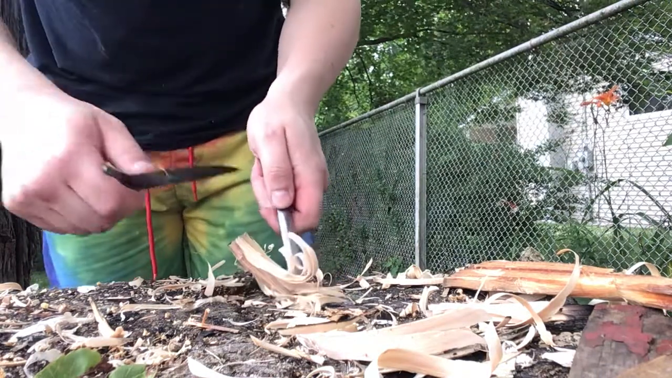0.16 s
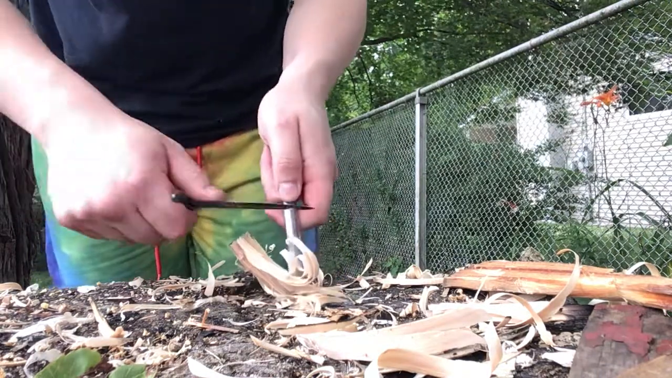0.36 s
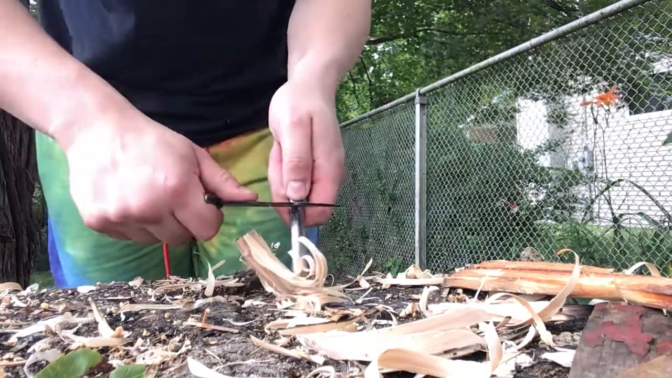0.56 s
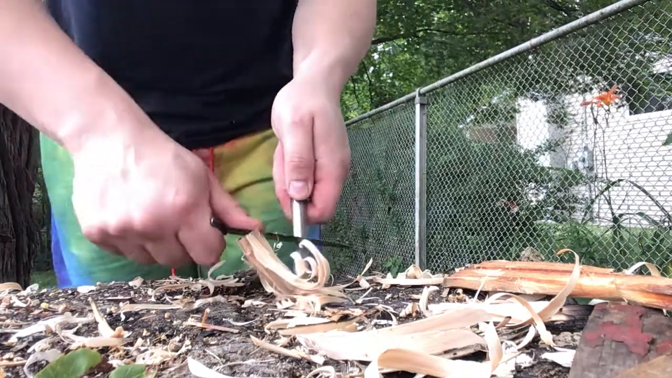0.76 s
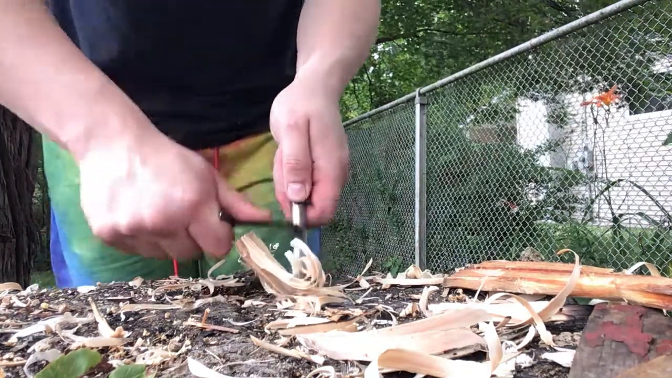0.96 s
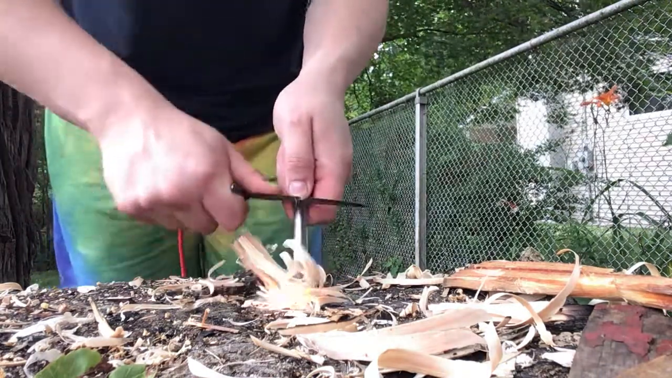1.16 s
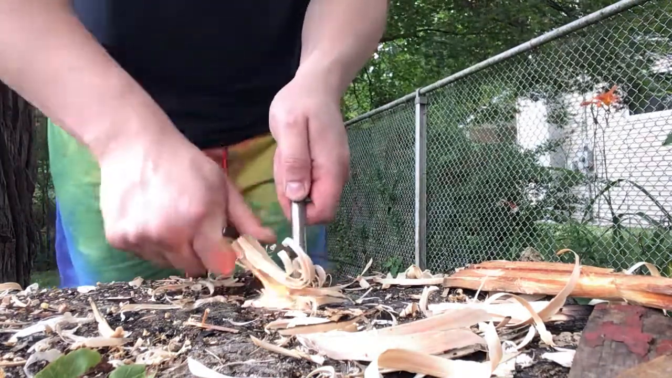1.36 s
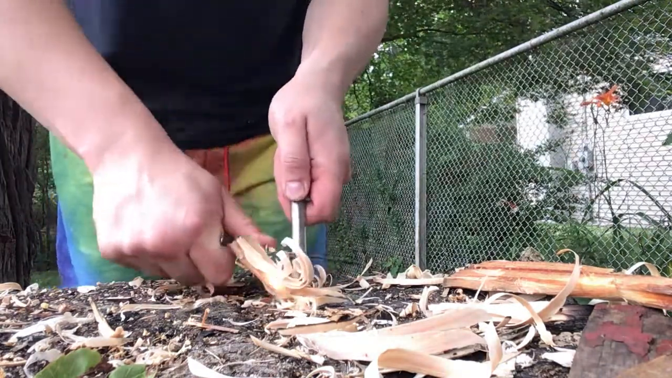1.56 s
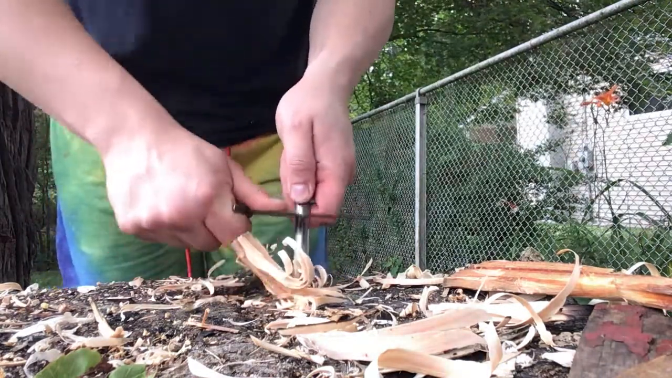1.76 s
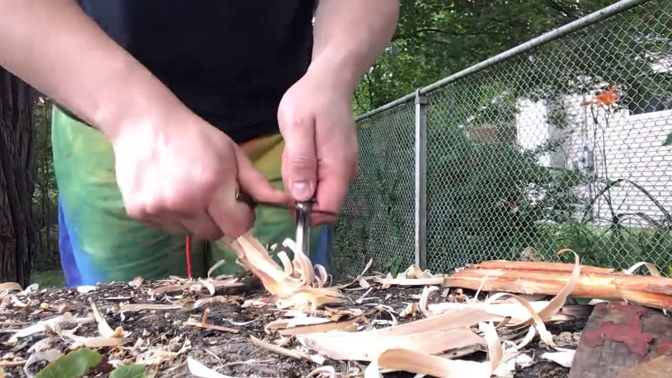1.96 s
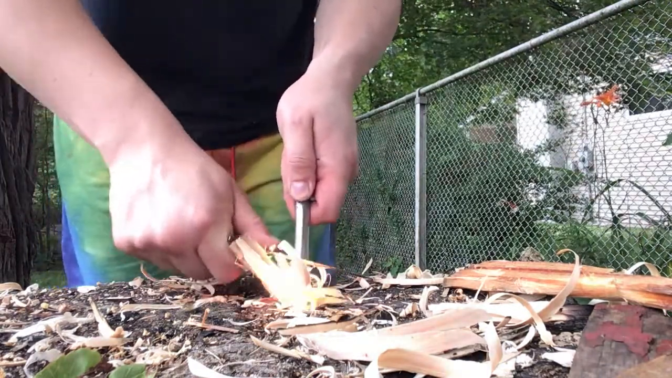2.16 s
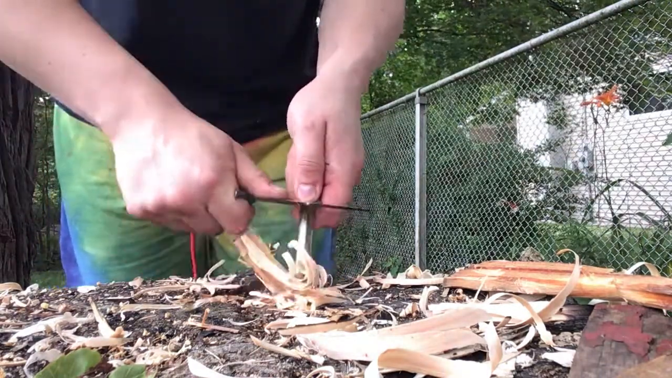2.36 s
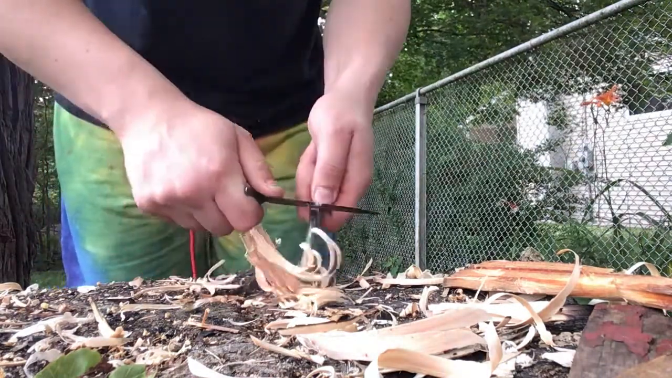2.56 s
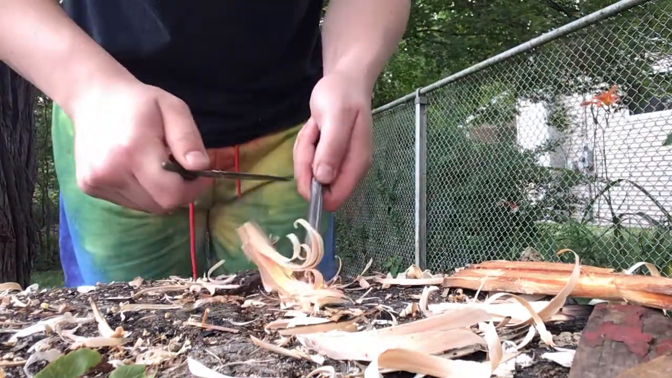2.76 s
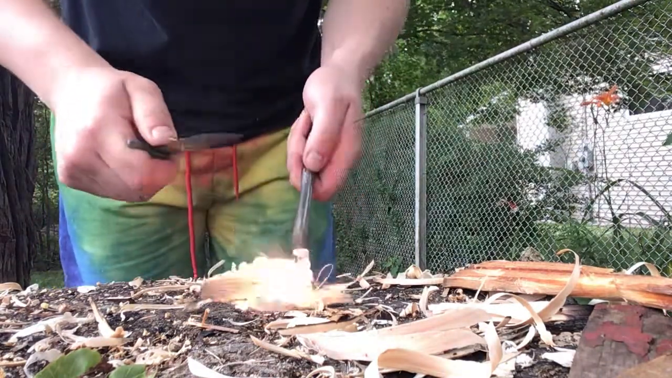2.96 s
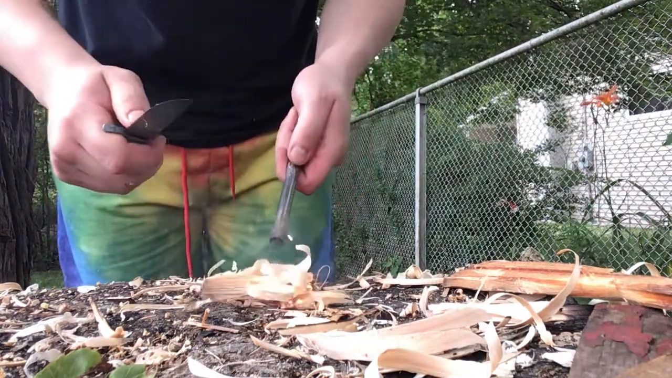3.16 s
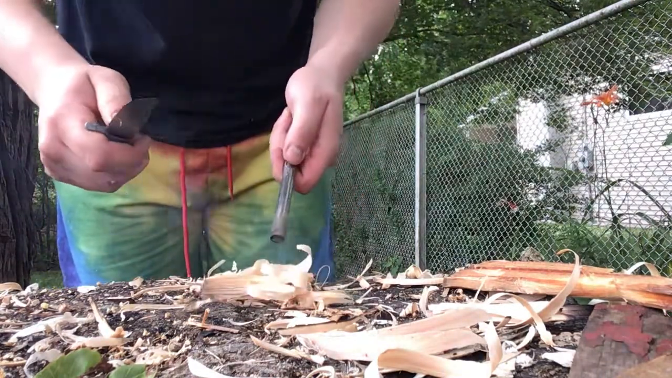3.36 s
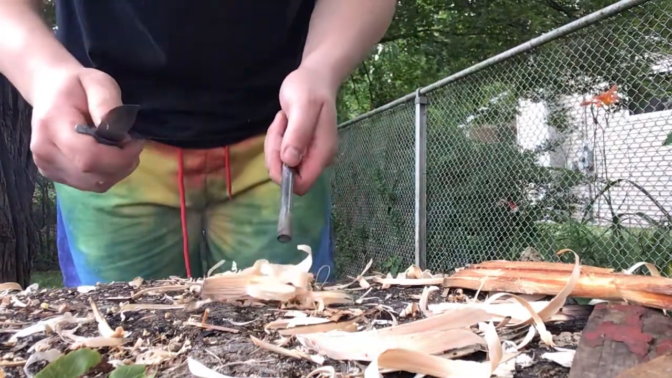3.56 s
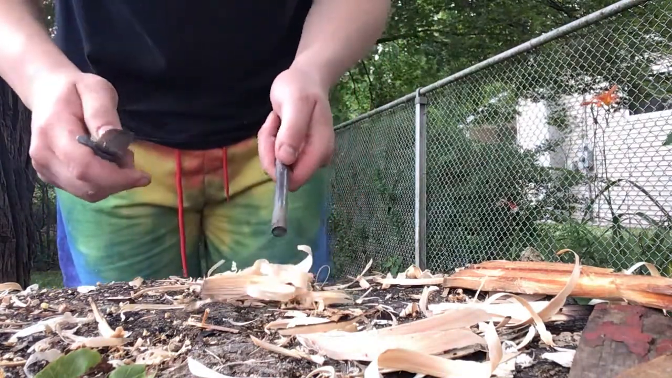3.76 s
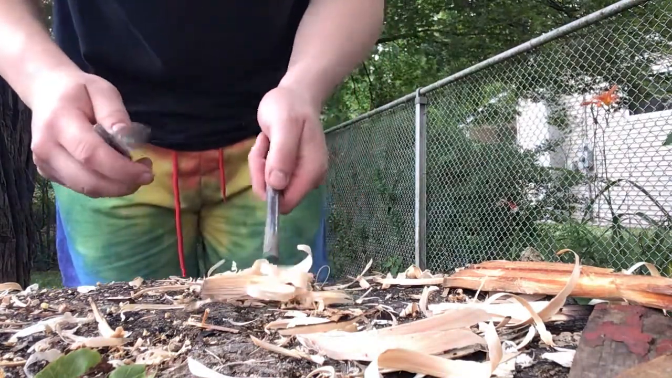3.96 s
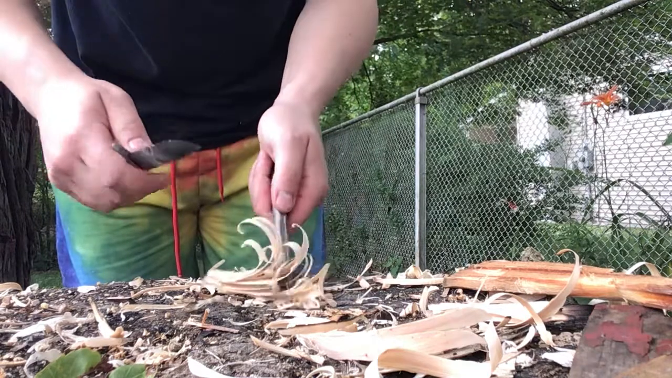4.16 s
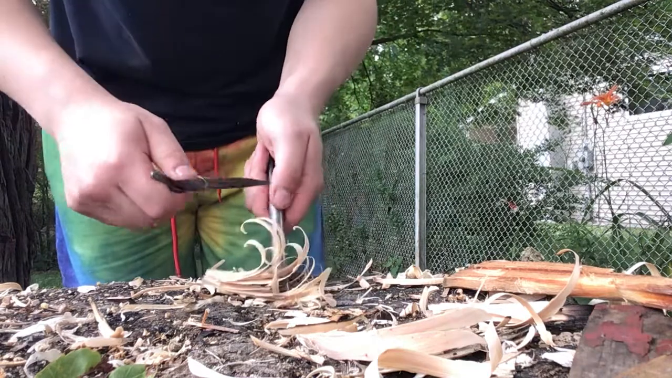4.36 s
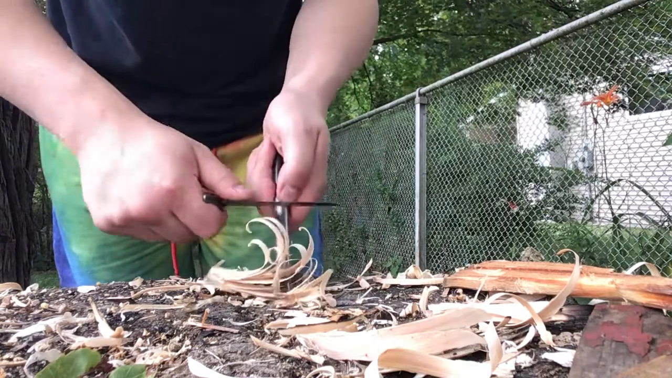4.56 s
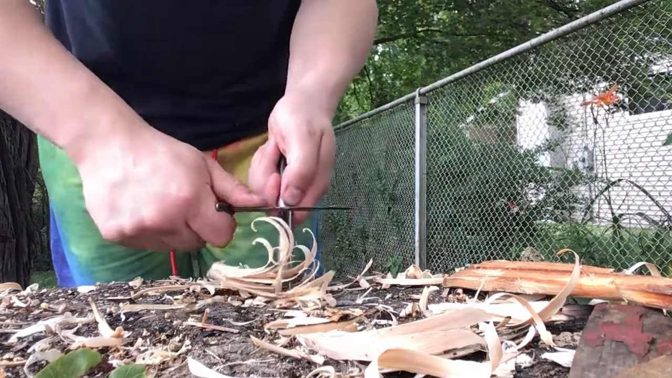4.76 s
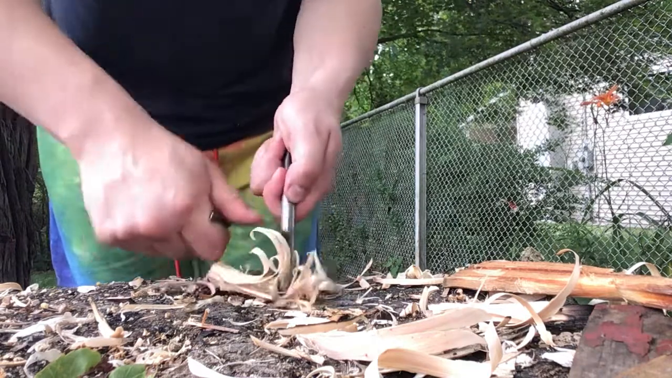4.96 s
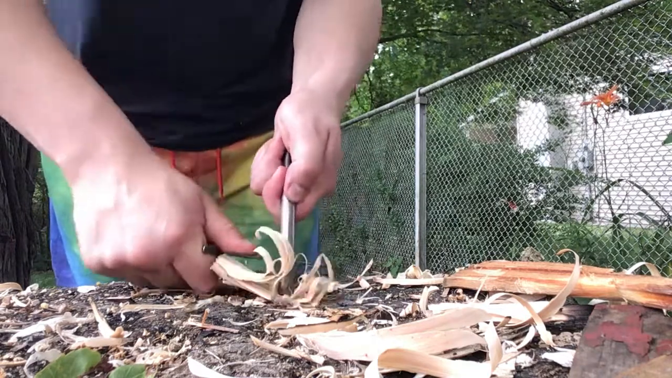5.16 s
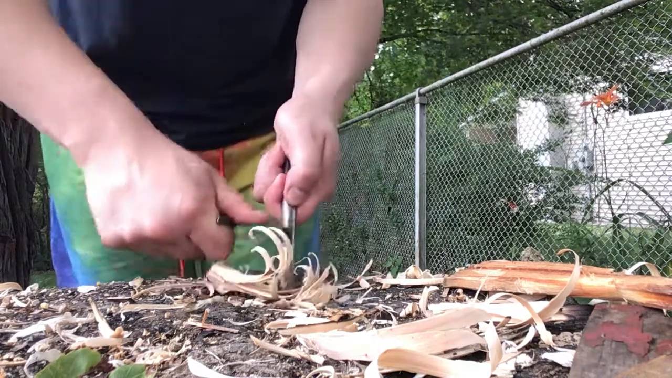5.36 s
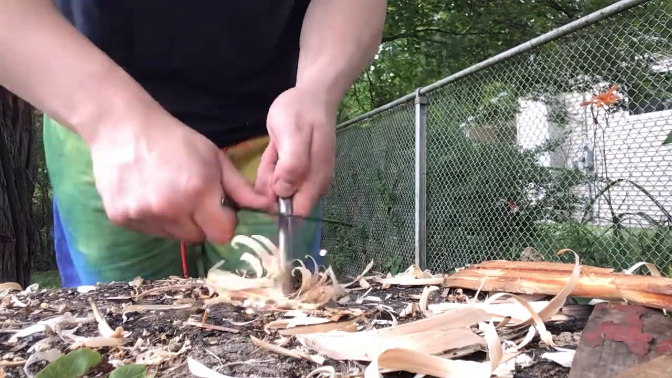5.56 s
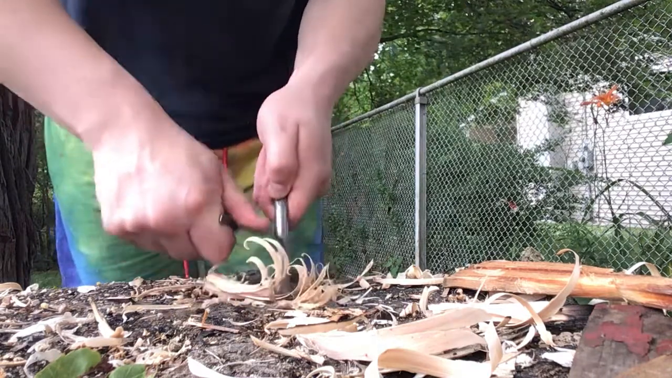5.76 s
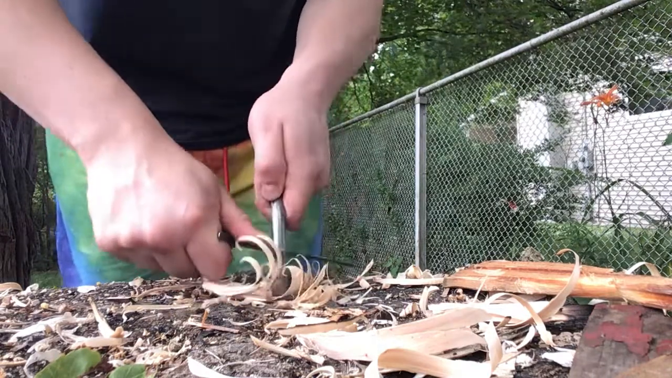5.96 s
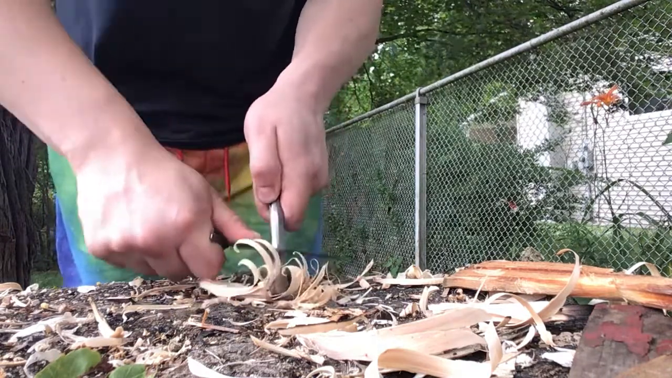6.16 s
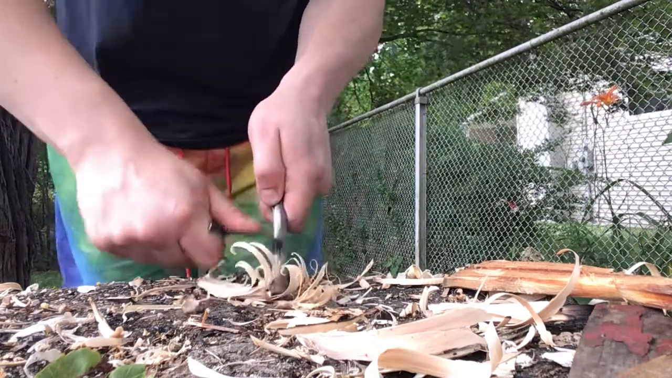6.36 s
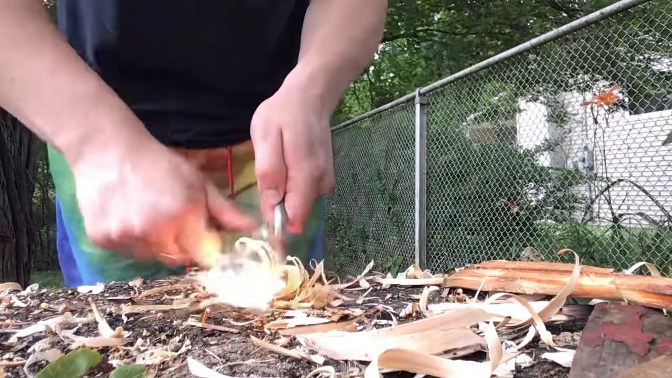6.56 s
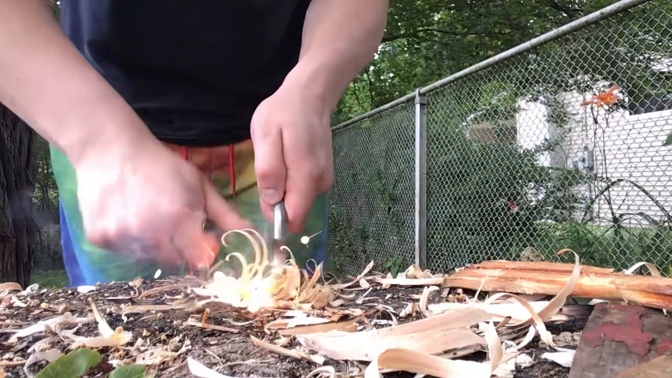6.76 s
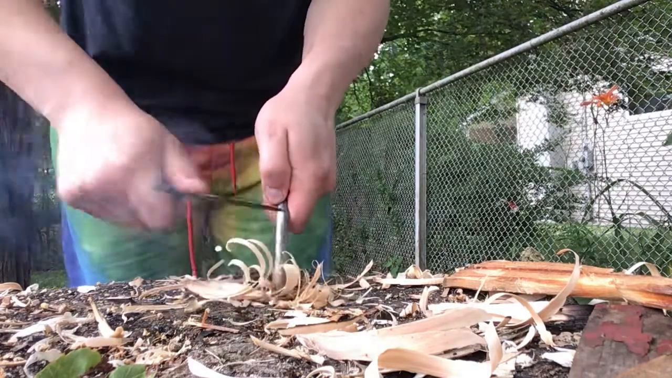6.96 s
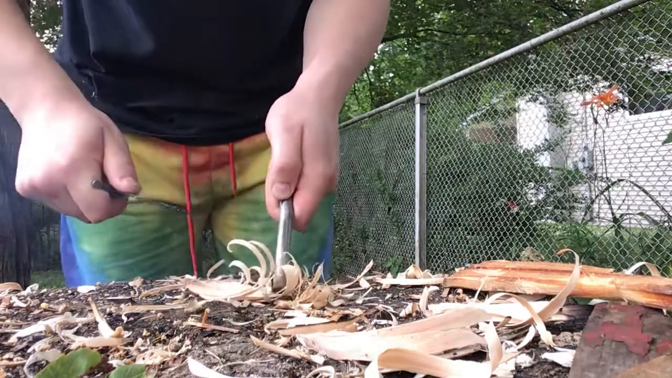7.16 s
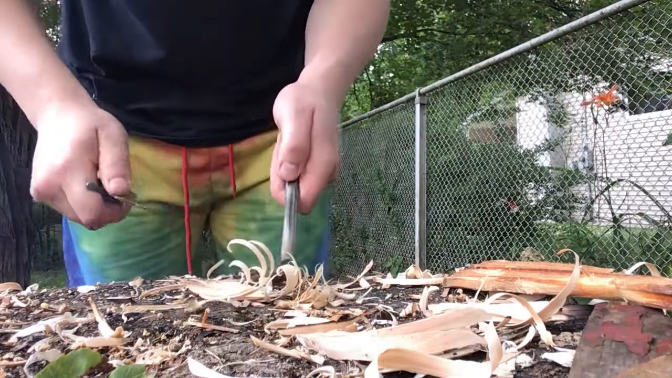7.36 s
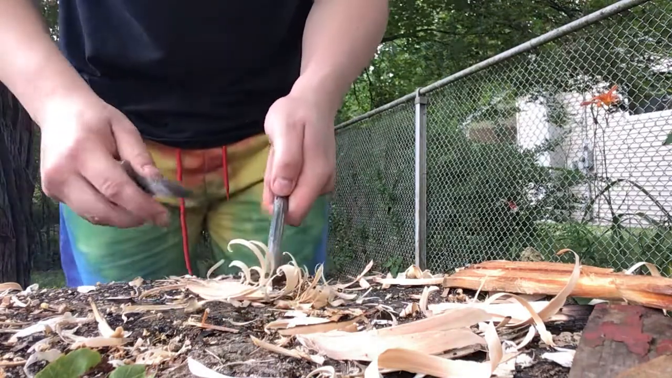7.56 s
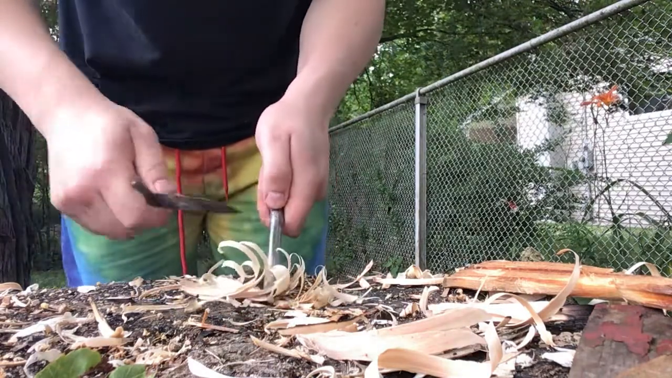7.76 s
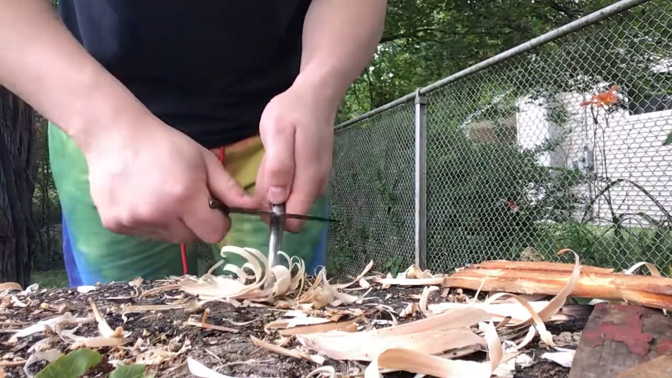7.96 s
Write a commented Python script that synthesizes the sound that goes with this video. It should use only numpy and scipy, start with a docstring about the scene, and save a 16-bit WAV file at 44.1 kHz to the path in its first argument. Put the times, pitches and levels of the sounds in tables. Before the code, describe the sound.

Quick metal scrapes along a fire-starting rod turn to gritty rasps and snapping sparks, over low outdoor rumble and faint birds.

```python
"""Fingers rustle in wood shavings, steel clacks, and a knife spine starts to hiss along a fire steel.
Sliding friction drives the resonances of rod and blade: light strokes hiss, and one squeals by stick-slip.
Hard strokes bite, rasp in spurts as chips break away, and throw sparks that pop.
Behind the work lies a back yard: low town rumble, a faint machine hum and far birds."""
import sys
import numpy as np
from scipy import signal
from scipy.fft import rfft, irfft
from scipy.io import wavfile

SR = 44100
rng = np.random.default_rng(int(sys.argv[2]) if len(sys.argv) > 2 else 0)


def wav_record(signal):
    """Record a signal, one row per channel, as 16-bit PCM in the file named by sys.argv[1]."""
    frames = np.transpose(np.atleast_2d(signal))
    bounded = np.clip(frames, -1, 1)
    # unit amplitude maps onto the largest positive 16-bit level
    quanta = np.round(bounded * 32767).astype(np.int16)
    wavfile.write(sys.argv[1], SR, quanta)


N = 353858
TIME = np.arange(N) / SR

# Spectral shapes of the noise sources: frequency_hz, relative_density_db
RUMBLE_SPECTRUM = [(15, -49), (25, -53), (49, 0.5), (229, -2.5), (263, -6), (285, -6.5), (451, -16.5),
                   (818, -20.5), (1890, -30), (3620, -27), (5880, -34), (8590, -35), (10400, -40.5),
                   (14000, -36.5), (16000, -48)]
RUSTLE_SPECTRUM = [(500, -3), (2200, -5), (4200, 3), (7200, -2.5), (9500, -11.5), (11500, 4), (13500, -0.5),
                   (15800, -8.5)]
TAP_SPECTRUM = [(500, -16.5), (1000, -15), (1600, -3), (2500, -9.5), (3650, 3.5), (4900, -7.5),
                (5900, -5.5), (8700, -22), (11700, -13), (13800, -17), (15500, -26)]
SPARK_SPECTRUM = [(150, -12), (900, -16), (2200, -5.5), (2900, -3), (4600, -1.5), (7500, -7.5),
                  (9500, -21.5), (11400, -8.5), (12500, -11), (15800, -17)]
CATCH_SPECTRUM = [(200, -6.5), (900, -4.5), (2200, -6), (3000, 2), (4300, 3.5), (5600, -5.5), (7500, -3),
                  (9000, -15), (11500, -5), (15800, -11)]
GLIDE_SPECTRUM = [(300, -54), (850, 3), (1150, -37.5), (1500, -9), (2300, -21), (2750, 1.5), (3700, -3.5),
                  (4300, -3), (5800, -7.5), (6600, -4.5), (8600, -17.5), (10200, -12), (14000, -10),
                  (15700, -32)]
RASP_SPECTRUM = [(80, -1), (300, 2), (900, -0.5), (1650, -3), (2350, -4), (2850, -1.5), (4400, -1),
                 (5600, -7), (6800, -5.5), (8800, -16), (11000, -4.5), (14500, -8.5), (15800, -7.5)]

# A small bird's falling notes: start_s, from_hz, level_db
BIRD_CHIRPS = [(3.59, 5640, -68), (3.81, 5250, -76), (6.8, 4750, -62), (6.955, 5700, -58), (7.1, 4600, -64),
               (7.229, 4800, -63.5)]
# Another bird's thin whistles: start_s, length_s, from_hz, to_hz, level_db
BIRD_WHISTLES = [(2.32, 0.3, 8200, 7750, -64.5), (7.696, .07, 9000, 8500, -71),
                 (7.825, 0.06, 9100, 8300, -63)]
# Two cries of a hawk-like bird: start_s, level_db
BIRD_CRIES = [(0.45, -62.5), (4.57, -61.5)]
# The course of one cry: age_s, pitch_hz, relative_db
CRY_CONTOUR = [(0, 905, -22), (.04, 916, -2), (.15, 900, 0), (.28, 892, -9), (.44, 890, 3), (.6, 862, -3),
               (.67, 840, -20)]
# Its harmonics: multiple, relative_db
CRY_HARMONICS = [(3, -10), (4, -0.5), (5, -20), (6, -10), (7, -16), (8, -28)]

# Fingers and shavings stir: start_s, length_s, level_db, ticks_per_s
SHAVING_RUSTLES = [(0.009, 0.054, -53.5, 1100), (0.047, 0.36, -65, 115), (2.309, 0.079, -54, 640),
                   (3.969, .04, -58, 350), (4.001, .14, -65, 1500), (4.17, .36, -73.5, 60),
                   (6.845, 0.13, -55, 300), (6.997, 0.18, -70.5, 48), (7.573, 0.094, -61, 2500)]
# Bending modes of the blade, damped by the hand: frequency_hz, gain_db, t60_s
BLADE_MODES = [(3700, -8, .04), (4900, -8, .1), (5900, 2, .03), (7400, -15, .12), (9620, -4, .09),
               (13650, 0, .06)]
# The blade is set on the rod: start_s, clack_db, ring_drive_db
BLADE_TAPS = [(0.4722, -36, -79), (4.595, -29.5, -55), (7.9465, -25, -41.5)]
# Bursting sparks: start_s, crack_db, puff_relative_db
SPARK_POPS = [(1.688, -22.5, -35), (1.959, -22, -47), (1.9763, -24, -39), (2.788, -25.5, -34),
              (2.8046, -23.5, -25), (2.992, -19.5, -9), (3.008, -17.5, -28), (3.2035, -13.5, -8)]
# The edge judders: start_s, from_hz, level_db
EDGE_CREAKS = [(1.143, 2900, -43.5), (1.405, 2200, -49.5), (5.204, 3970, -40), (5.228, 3000, -46.5),
               (6.24, 2650, -49), (6.632, 3200, -44)]
# The edge catches and skips: start_s, relative_db, low_boost_db
EDGE_CATCHES = [(1.1262, -35, -21), (1.373, -28, 2), (1.6248, -21, 3), (1.903, -29.5, -2),
                (2.3, -31.5, 6.5), (2.3206, -22.5, 2.5), (2.4755, -20, 5.5), (2.7266, -27.5, -6),
                (3.2363, -30.5, 9.5), (3.27, -30.5, 10.5), (3.371, -37, 10), (3.6916, -30, 6.5),
                (5.424, -29, 6.5), (5.5798, -24.5, 2.5), (5.8885, -29.5, 7), (6.37, -30, -10),
                (6.8745, -40, -3), (6.9107, -38.5, 3), (6.939, -38.5, 5)]
# The course of the squeal: time_s, pitch_hz, relative_db
SQUEAL_CONTOUR = [(.828, 2650, -62), (.846, 2520, -32), (.850, 2390, -37), (.854, 2430, -33),
                  (.856, 2370, -24), (.866, 2450, -21), (.871, 2600, -30), (.875, 2900, -54)]
# Its harmonics: multiple, relative_db
SQUEAL_HARMONICS = [(1, -8), (2, -2.5), (3, -22), (4, -23), (5, -17)]
# Resonances of rod and blade in each grip: start_s, [(centre_hz, boost_db)]
GRIP_RESONANCES = [(0, [(3750, 4.5), (11100, 4), (13600, 10.5)]), (4.5, [(3400, 9), (9750, 9), (13800, 5)])]
# Short strokes; sheen is top treble against the middle band: start_s, length_s, level_db, sheen_db
LIGHT_STROKES = [(0.629, .11, -50.5, -2.5), (0.922, .12, -48.5, -2.5), (1.107, 0.11, -47, -7),
                 (1.196, .15, -49.5, -3), (1.473, .13, -49.5, -0.5), (1.757, .12, -48.5, -1),
                 (2.454, 0.051, -48.5, -4), (2.538, 0.072, -54, -5), (4.752, .12, -48, -4),
                 (4.901, .11, -50.5, -8.5), (5.04, .12, -48.5, -4), (5.194, 0.084, -52.5, -4.5),
                 (5.307, 0.093, -49, -4.5), (5.561, 0.13, -47.5, -4.5), (5.73, .074, -53, -8.5),
                 (5.832, .1, -46.5, -3.5), (5.98, 0.072, -53.5, -6), (6.065, .11, -51, -2.5),
                 (6.218, .07, -53.5, -6), (6.313, 0.058, -46.5, 1), (6.71, .1, -51, -3)]
# Long strokes, the level following the hand's pressure: rasp_share_db, sheen_db, [(time_s, level_db)]
HARD_STROKES = [(-4.5, -7.5, [(1.333, -57), (1.343, -48), (1.443, -56), (1.451, -43.5), (1.461, -45),
                (1.475, -67)]), (-3.5, -5, [(1.565, -55.0), (1.61, -53), (1.622, -46.5), (1.658, -52.5),
                (1.73, -45.5), (1.76, -68)]), (-7, -4, [(1.896, -52), (1.904, -48), (1.936, -52.5),
                (1.964, -44.0), (2.145, -50.5)]), (-1.5, -6.5, [(2.145, -54.5), (2.173, -42),
                (2.235, -50.5), (2.261, -47.5), (2.295, -62)]), (-2.5, -10, [(2.62, -65.5), (2.638, -53.5),
                (2.648, -60), (2.752, -44), (2.78, -56), (2.796, -43.5), (2.871, -53.5), (2.919, -51.5)]),
                (0, -7.5, [(2.921, -53.0), (2.999, -39.0), (3.055, -51.5), (3.22, -57.5), (3.265, -50.5),
                (3.308, -65.0)]), (-1.5, -5, [(5.386, -52), (5.424, -43), (5.47, -43), (5.527, -51.5),
                (5.549, -66.5)]), (-0.5, -6.5, [(6.366, -58), (6.378, -42.5), (6.517, -46.5),
                (6.527, -51.5), (6.613, -41.0), (6.735, -52.5)])]


def from_db(db):
    """Amplitude ratio of a level in decibels."""
    return 10 ** (np.asarray(db) / 20)


def rms_one(x):
    """Normalisation to unit power."""
    return x / np.sqrt(np.mean(x ** 2) + 1e-20)


def drift(corner_hz):
    """Low-passed noise: a smooth random wander of unit power."""
    pole = np.exp(-2 * np.pi * corner_hz / SR)
    return rms_one(signal.lfilter([1], [1, -2 * pole, pole * pole], rng.standard_normal(N + SR))[SR:])


def band(x, hz, kind):
    """Second-order Butterworth high- or low-pass."""
    return signal.sosfilt(signal.butter(2, hz, kind, fs=SR, output="sos"), x)


def response(spectrum, size=8192):
    """Minimum-phase impulse response of a body with this spectrum; unit energy."""
    hz, db = np.transpose(spectrum)
    grid_hz = np.maximum(np.fft.rfftfreq(size, 1 / SR), 1)
    magnitude = from_db(np.interp(np.log(grid_hz), np.log(hz), db))
    cepstrum = irfft(np.log(magnitude))
    cepstrum[1:size // 2] *= 2   # folding onto positive time makes it causal
    cepstrum[size // 2 + 1:] = 0
    impulse = irfft(np.exp(rfft(cepstrum)))
    return impulse / np.linalg.norm(impulse)


def colour(force, spectrum):
    """Source and filter: a force is convolved with a body's impulse response."""
    return signal.oaconvolve(force, response(spectrum))[:len(force)]


def add(out, start_s, piece):
    """Superposition of a piece onto the output."""
    start = max(round(start_s * SR), 0)
    out[start:start + len(piece)] += piece[:max(N - start, 0)]


def grains(per_s, spread_db):
    """Shot noise: tiny fractures of uneven size at random moments; unit power."""
    sizes = from_db(spread_db * np.minimum(rng.exponential(1, N), 4))
    occurs = rng.random(N) < per_s / SR
    return rms_one(occurs * sizes * rng.choice([-1, 1], N))


def burst(length_s, spectrum, size=2048):
    """Micro-impacts merge into a noise transient that swells fast and dies; peak about 1."""
    age = 2 * TIME[:size] / length_s
    envelope = age * np.exp(1 - age)
    flurry = colour(rng.standard_normal(size) * envelope, spectrum)
    return flurry * np.linalg.norm(envelope) / np.linalg.norm(flurry) / 2


def harmonic_tone(pitch_hz, harmonics):
    """Fourier series on a moving fundamental; unit power."""
    phase = 2 * np.pi * np.cumsum(pitch_hz) / SR
    return rms_one(sum(from_db(db) * np.sin(round(multiple) * phase) for multiple, db in harmonics))


def glissandi(notes, waver):
    """Sliding sine tones, made hoarse by random frequency modulation."""
    out, wobble = np.zeros(N), 1 + waver * drift(640)
    for start_s, length_s, from_hz, to_hz, db in notes:
        count = int(length_s * SR)
        pitch_hz = np.geomspace(from_hz, to_hz, count) * wobble[int(start_s * SR):][:count]
        phase = 2 * np.pi * np.cumsum(pitch_hz) / SR
        add(out, start_s, from_db(db) * np.hanning(count) * np.sin(phase))
    return out


def falling(notes, length_s, pitch_ratio):
    """Notes for glissandi that all fall by one frequency ratio."""
    return [(start_s, length_s, hz, hz * pitch_ratio, db) for start_s, hz, db in notes]


def scattering(x, wet_db, t60_s, delay_s):
    """Diffuse reflections from stump, fence and trees add an exponentially decaying tail."""
    age = TIME[:SR // 3]
    tail = rng.standard_normal(len(age)) * from_db(-60 * age / t60_s) * (age > delay_s)
    return x + from_db(wet_db) * signal.oaconvolve(x, tail / np.linalg.norm(tail))[:N]


def yard(rumble_db=-53.5, hum_hz=286.8, hum_db=-67.5):
    """Ambient noise: broadband town rumble and a machine's hum, a tone of wandering phase."""
    hum = np.sqrt(2) * np.sin(2 * np.pi * hum_hz * TIME + 0.73 * drift(1.6))
    rumble = band(colour(rng.standard_normal(N), RUMBLE_SPECTRUM), 46, "high")
    return from_db(rumble_db) * rumble + from_db(hum_db) * hum


def birds(waver=0.00456, flutter_db=3.5):
    """Sine chirps and whistles and two nasal harmonic cries, blurred by scattering among the trees."""
    chirps = falling(BIRD_CHIRPS, length_s=0.059, pitch_ratio=0.68)
    out = glissandi(chirps + BIRD_WHISTLES, waver=0.028)
    contour_s, hz, db = np.transpose(CRY_CONTOUR)
    age = TIME[TIME < contour_s[-1]]
    for start_s, cry_db in BIRD_CRIES:
        pitch_hz = np.interp(age, contour_s, hz) * (1 + waver * drift(40)[:len(age)])
        envelope = from_db(cry_db + np.interp(age, contour_s, db) + flutter_db * drift(34)[:len(age)])
        add(out, start_s, envelope * harmonic_tone(pitch_hz, CRY_HARMONICS))
    return scattering(out, wet_db=-4.5, t60_s=0.72, delay_s=0.0055)


def rustles():
    """Fingers and shavings give swells of dry shot noise as the grip shifts."""
    out = np.zeros(N)
    for start_s, length_s, db, per_s in SHAVING_RUSTLES:
        swell = np.sqrt(np.hanning(int(length_s * SR)))
        ticks = grains(per_s, spread_db=2.5)[:len(swell)]
        add(out, start_s, from_db(db) * swell * rms_one(ticks))
    return colour(out, RUSTLE_SPECTRUM)


def blade_ring(force):
    """Modal vibration: each bending mode of the blade answers as a damped oscillator."""
    out = np.zeros(N)
    for hz, db, t60_s in BLADE_MODES:
        decay, angle = from_db(-60 / (t60_s * SR)), 2 * np.pi * hz / SR
        feedback = [1, -2 * decay * np.cos(angle), decay * decay]
        out += from_db(db) * signal.lfilter([0, np.sin(angle)], feedback, force + 1e-18)
    return out


def taps(length_s=0.0023):
    """Impact excitation: steel meets rod with a clack and the blade rings on."""
    clacks, blows = np.zeros((2, N))
    for start_s, clack_db, ring_drive_db in BLADE_TAPS:
        add(clacks, start_s, from_db(clack_db) * burst(length_s, TAP_SPECTRUM))
        add(blows, start_s, from_db([ring_drive_db]))
    return clacks + blade_ring(blows)


def spark_pops(puff_hz=210, knock_hz=470, decay_s=0.0031, spatter_db=-3.0, spatter_s=0.00099):
    """A bursting spark is a pressure impulse: one crack, a brief spatter and a low puff of air."""
    out, crack = np.zeros(N), response(SPARK_SPECTRUM)
    crack /= np.abs(crack).max()
    age = TIME[:len(crack)]
    fade = np.exp(-age / decay_s)
    knock = np.sin(2 * np.pi * knock_hz * age) * fade ** 2
    puff = knock - np.sin(2 * np.pi * puff_hz * age) * fade / 2
    for start_s, db, puff_db in SPARK_POPS:
        add(out, start_s, from_db(db) * (crack + from_db(puff_db) * puff))
        add(out, start_s, from_db(db + spatter_db) * burst(spatter_s, SPARK_SPECTRUM))
    return out


def creaks():
    """Frictional judder: the edge creaks hoarsely and drops in pitch as it slows."""
    return glissandi(falling(EDGE_CREAKS, length_s=0.0406, pitch_ratio=0.72), waver=0.169)


def catches(body_hz=1500, gain_db=-3.5):
    """Transient excitation: the edge digs in with a short rip; deeper rips have more low body."""
    out = np.zeros(N)
    for start_s, db, low_boost_db in EDGE_CATCHES:
        rip = burst(0.004, CATCH_SPECTRUM)
        body = (from_db(low_boost_db) - 1) * band(rip, body_hz, "low")
        add(out, start_s, from_db(db + gain_db) * (rip + body))
    return out


def squeal(waver=0.025, flutter_db=3.5, gain_db=-3.0, grit_db=-11.0, ring_db=-42.0):
    """Stick-slip oscillation: the spine sings unsteadily, and its gritty friction shakes the blade."""
    time_s, hz, db = np.transpose(SQUEAL_CONTOUR)
    pitch_hz = np.interp(TIME, time_s, hz) * (1 + waver * drift(750))
    tone = harmonic_tone(pitch_hz, SQUEAL_HARMONICS)
    sounding = (TIME > time_s[0]) & (TIME < time_s[-1])
    envelope = from_db(np.interp(TIME, time_s, db) + gain_db + flutter_db * drift(250)) * sounding
    grit = band(envelope * rng.standard_normal(N), 2200, "high")
    hiss = from_db(grit_db) * colour(grit, GLIDE_SPECTRUM)
    return envelope * tone + hiss + from_db(ring_db) * blade_ring(grit)


def light_strokes(slow_level_db=-50, slow_rasp_db=-6, rasp_slope=0.96):
    """Friction noise follows sliding speed through one arch; slower, quieter strokes rasp more."""
    for start_s, length_s, db, sheen_db in LIGHT_STROKES:
        arch = np.abs(np.sin(np.linspace(0, np.pi, int(length_s * SR)))) ** 0.96
        rasp_db = slow_rasp_db - rasp_slope * (db - slow_level_db)
        yield start_s, from_db(db) * arch, rasp_db, sheen_db


def hard_strokes(ramp_s=0.008):
    """Cutting noise follows the hand's pressure, with short ramps as the edge digs in and lets go."""
    for rasp_db, sheen_db, pressure in HARD_STROKES:
        time_s, db = np.transpose(pressure)
        corners_s = [time_s[0] - ramp_s, time_s[0], time_s[-1], time_s[-1] + ramp_s]
        time = np.arange(corners_s[0], corners_s[-1], 1 / SR)
        contact = np.interp(time, corners_s, [0, 1, 1, 0])
        yield corners_s[0], from_db(np.interp(time, time_s, db)) * contact, rasp_db, sheen_db


def stroke_spectrum(start_s, cutting, sheen_db, half_width_hz=340, scatter_hz=120, damping=0.74):
    """Resonances of rod and blade shape a blend of glide and rasp; unit power in the middle band."""
    hz = np.linspace(60, 16000, num=100)
    middle, top = (hz > 2500) & (hz < 8000), hz > 9300
    glide = from_db(np.interp(hz, *np.transpose(GLIDE_SPECTRUM))) ** 2
    rasp = from_db(np.interp(hz, *np.transpose(RASP_SPECTRUM))) ** 2
    power = (1 - cutting) * glide / glide[middle].sum() + cutting * rasp / rasp[middle].sum()
    resonances = [peaks for since_s, peaks in GRIP_RESONANCES if since_s <= start_s][-1]
    peaks_db = 0
    for centre_hz, boost_db in resonances:
        detuning_hz = hz - centre_hz - scatter_hz * rng.standard_normal()
        peaks_db += boost_db / (1 + (detuning_hz / half_width_hz) ** 2)
    power *= from_db(peaks_db * (1 - damping * cutting)) ** 2   # pressing hard damps the resonances
    # the angle of the edge sets how much top treble the stroke has
    power[top] *= from_db(sheen_db) ** 2 * power[middle].sum() / power[top].sum()
    return hz, power / power[middle].sum()


def scraping(flutter_db=3.0, crackle_db=-7.0, chatter_db=3.0, spurt_db=1.53, ripple_db=2.5):
    """Friction and fracture: the gliding spine hisses; as it bites, chips and sparks take over."""
    out = np.zeros(N)
    friction = rms_one(grains(per_s=20000, spread_db=3.0) * from_db(flutter_db * drift(88)))
    sparks = from_db(crackle_db) * grains(per_s=150, spread_db=-0.5)
    chips = grains(per_s=9000, spread_db=3.0) * from_db(chatter_db * drift(105) + spurt_db * drift(21))
    rasp = rms_one(chips + sparks)
    for start_s, envelope, rasp_db, sheen_db in [*light_strokes(), *hard_strokes()]:
        cutting = np.clip(from_db(rasp_db) ** 2, 0, 1)   # the rasp's share of the power
        hz, power = stroke_spectrum(start_s, cutting, sheen_db)
        span = slice(int(start_s * SR), int(start_s * SR) + len(envelope))
        texture = np.sqrt(1 - cutting) * friction[span] + np.sqrt(cutting) * rasp[span]
        force = np.sqrt(power.sum()) * envelope * texture
        # the rod's fine resonances change as the contact slides from one end to the other
        travel = np.linspace(0, 1, len(envelope))
        for weight in (1 - travel, travel):
            body_db = 10 * np.log10(power) + ripple_db * rng.standard_normal(len(hz))
            body = response(np.column_stack([hz, body_db]), size=2048)
            add(out, start_s, signal.fftconvolve(force * weight, body))
    return out


def scene():
    """Superposition in one channel: close work on the rod, weakly scattered, over birds and yard."""
    near = scraping() + squeal() + creaks() + catches() + taps() + spark_pops() + rustles()
    return (scattering(near, wet_db=-16.5, t60_s=0.15, delay_s=0.00176) + birds() + yard())[None]


def record(dry, low_cut_hz=34, high_cut_hz=15800):
    """Band limiting: the small microphone loses the deepest bass, and the top is cut steeply."""
    steep_low_pass = signal.ellip(10, 0.1, 80, high_cut_hz, fs=SR, output="sos")
    return signal.sosfilt(steep_low_pass, band(dry, low_cut_hz, "high"))


dry = scene()
out = record(dry)
wav_record(out)
```